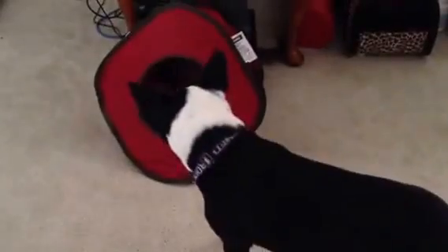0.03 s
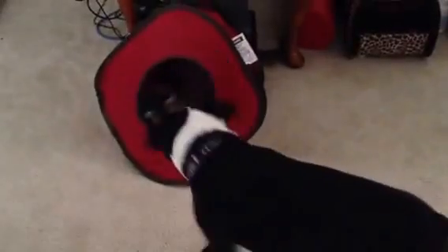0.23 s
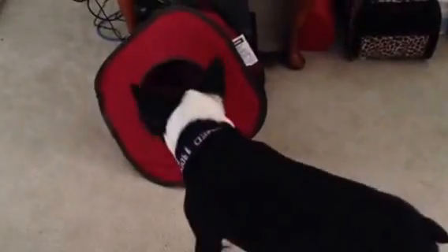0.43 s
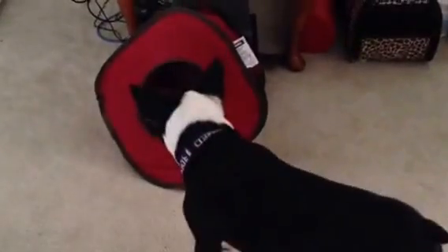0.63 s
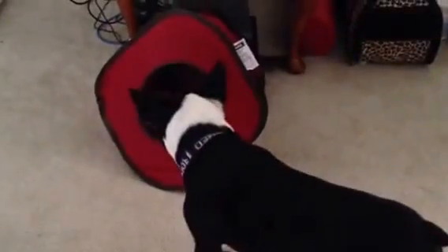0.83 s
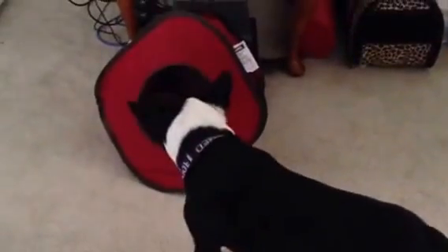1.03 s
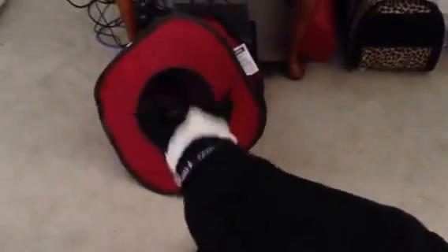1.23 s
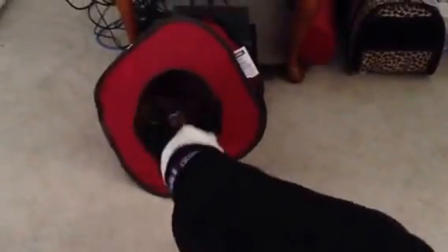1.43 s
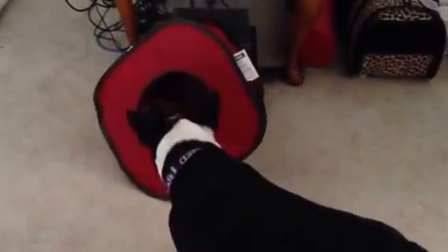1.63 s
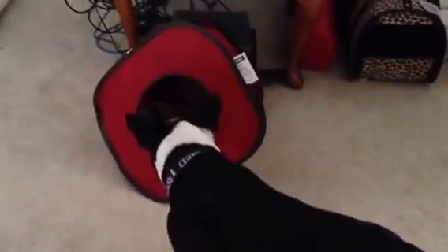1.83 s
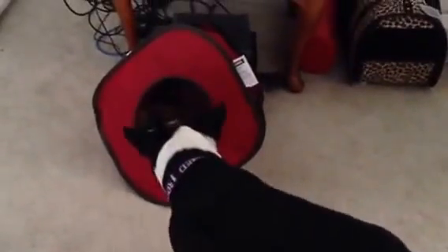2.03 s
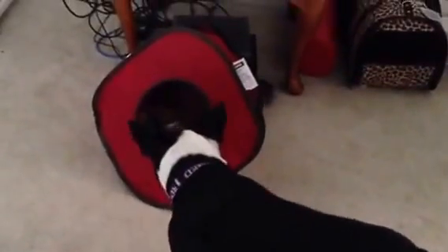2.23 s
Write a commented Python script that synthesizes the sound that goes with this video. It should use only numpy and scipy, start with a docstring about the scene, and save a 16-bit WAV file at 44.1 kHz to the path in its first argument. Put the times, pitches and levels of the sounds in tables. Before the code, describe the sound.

Three low, muffled dog woofs with sniffs and huffs in a quiet room.

```python
"""Over a faint room hum and microphone hiss, a small dog snuffles at a fabric cube in a carpeted room.
It gives three short, muffled woofs into the cloth. Each starts with slow flaps of the vocal folds,
jumps up in pitch and dies in a huff of air through the nose. The flaps make the throat and the nearly
closed mouth ring, and the walls answer with dull echoes."""
import sys
import numpy as np
from scipy import signal
from scipy.fft import rfft, irfft
from scipy.io import wavfile

SR = 44100
rng = np.random.default_rng(int(sys.argv[2]) if len(sys.argv) > 2 else 0)


def wav_out(sig):
    """Save sig, one row per channel (or a flat mono array), as 16-bit PCM at SR to the path in sys.argv[1]."""
    wavfile.write(sys.argv[1], SR, np.round(np.clip(np.atleast_2d(sig).T, -1, 1) * 32767).astype(np.int16))


N = 105840

# tone colour of the steady background: (frequency [Hz], relative level [dB])
BACKGROUND_COLOUR = [(15, -67), (25, -24), (64, -30), (98, -14.5), (125, -14), (224, -3), (264, -7),
                     (450, -8.5), (790, -15.5), (903, -13), (978, -19), (1390, -13), (1540, -18.5),
                     (3930, -15), (15000, -19)]
# the muzzle rubs the cloth: (time [s], spread in time [s], frequency [Hz], level [dB])
CLOTH_RUBS = [(0.026, 0.0041, 770, -68), (0.826, 0.096, 246, -73), (1.242, .005, 850, -70),
              (1.255, 0.0087, 200, -59.5), (2.01, 0.087, 242, -74.5)]
# nostril whistles: (time [s], spread in time [s], frequency [Hz], width [Hz], level [dB])
WHISTLES = [(0.127, .004, 3530, 300, -67), (0.144, 0.015, 1570, 159, -67), (0.149, 0.012, 1960, 221, -64),
            (0.177, .005, 1070, 59.4, -62), (2.135, 0.0067, 1850, 202, -67),
            (2.136, 0.014, 7570, 800, -69.5)]
# sniffs at the cloth: (peak time [s], rise [s], fall [s], level [dB], hiss relative to nose ring [dB])
SNIFFS = [(0.146, 0.029, 0.014, -66, -11)]
# the row at 1.2 s is a faint, very short tick of hiss just before the second woof; the rest are
# nose huffs: (peak time [s], rise [s], fall [s], level [dB], hiss relative to nose ring [dB])
HUFFS_AND_TICK = [(.255, 0.071, 0.09, -69, 5), (0.279, 0.0084, 0.031, -56.5, -11.5),
                  (1.296, 0.025, 0.052, -62.5, 3), (1.2, .004, 0.011, -75, -6),
                  (2.086, 0.025, 0.027, -67, 2), (2.134, 0.031, 0.047, -62, -2.5)]
# where the inside of the nose rings: (frequency [Hz], width [Hz], gain [dB])
NOSE_RINGS = [(1080, 370, 6.5), (1477, 490, 1.5), (1840, 720, 1.5), (2570, 170, -5)]
# tone colour of the hiss at the nostrils: (frequency [Hz], relative level [dB])
NOSTRIL_COLOUR = [(1500, -3.5), (2800, -11), (4000, -4), (5200, -4.5), (6400, -4.5), (7700, -7),
                  (9500, -13.5), (15000, -18)]
# the course of each woof: (time [s], pitch [Hz], effort [dB], mouth opening as a gain [dB])
FIRST_WOOF = [(.214, 58.55, -36.5, 1.5), (0.228, 69.66, -31.5, 1), (.234, 166.3, -29.5, -22),
              (.247, 150.7, -21, -14), (0.257, 140.5, -24, -8.5), (0.265, 125, -26, -19),
              (.274, 151.2, -46.5, -23), (0.288, 142.9, -19.5, -26)]
SECOND_WOOF = [(1.262, 90.1, -41, -1), (1.275, 99.1, -31.5, -2.5), (1.283, 203.9, -36, 0.5),
               (1.297, 203.6, -28, 1), (1.309, 153.8, -25.5, -11), (1.323, 130, -40.5, -6.5),
               (1.340, 132, -48, -25)]
THIRD_WOOF = [(2.055, 86, -36, -9.5), (2.0645, 110.6, -32.5, -1), (2.068, 195.3, -32, -11),
              (2.081, 206.7, -32, -11), (2.093, 185, -32.5, -40), (2.103, 195, -52.5, -19),
              (2.112, 200, -58, -12)]
# a row per woof: (timing scatter [cycles], strength scatter [dB], nose dip depth [0-1], lip cutoff [Hz])
WOOF_CHARACTER = [(0.044, -0.5, 0.92, 874), (0.023, 2, 0, 957), (.01, 1.5, 0.47, 914)]
# where the throat rings: (frequency [Hz], width [Hz], gain [dB])
THROAT_RINGS = [(205.7, 84, -1), (264, 51, -9.5)]
# where the mouth rings: (frequency [Hz], width [Hz], gain [dB])
MOUTH_RINGS = [(503, 24, -7.5), (566, 69, -16), (630, 107, -21.5), (825, 58, -8), (920, 47, -15),
               (997, 38, -3.5), (1166, 23, -20)]
# low notes that ring between the walls: (frequency [Hz], width [Hz], gain [dB])
ROOM_RINGS = [(196.3, 6.1, -14.5), (238.2, 4.8, -8.5), (281.7, 3.9, -9)]
# single bounces off the walls: (delay [s], gain [dB])
WALL_ECHOES = [(.037, -14.5), (0.075, -18)]
# the room's fading tail: (low edge [Hz], high edge [Hz], time to fade by 60 dB [s], gain [dB])
ROOM_TAILS = [(139, 230, 0.35, -16.5), (417, 1930, 0.27, -7), (1420, 9200, 0.23, -10)]


def gain(db):
    """Turn decibels into a number to multiply by."""
    return 10 ** (np.asarray(db) / 20)


def unit(x):
    """Scale a sound to an average (rms) size of 1."""
    return x / np.sqrt(np.mean(x ** 2))


def keep(x, hz, kind, order=2):
    """Keep the lows, the highs or a band; a higher order cuts more sharply."""
    return signal.sosfilt(signal.butter(order, hz, kind, fs=SR, output="sos"), x)


def ring(x, hz, width_hz):
    """Ring at one frequency; a narrower width rings longer."""
    return signal.lfilter(*signal.iirpeak(hz, hz / width_hz, fs=SR), x)


def cavity(x, rings):
    """A hollow space rings at several frequencies at once."""
    return sum(gain(db) * ring(x, hz, width_hz) for hz, width_hz, db in rings)


def coloured_noise(colour):
    """Steady noise of size 1 with the given tone colour."""
    hz, db = np.array(colour).T
    frequencies = np.maximum(np.fft.rfftfreq(N, 1 / SR), 1)
    shape = gain(np.interp(np.log(frequencies), np.log(hz), db))
    return unit(irfft(rfft(rng.standard_normal(N)) * shape, N))


def noise_burst(t, at, spread, hz, width_hz):
    """Noise around one frequency swells and fades in a bell shape."""
    swell = np.exp(-((t - at) / spread) ** 2 / 2)
    band = ring(rng.standard_normal(N), hz, width_hz)
    return swell * unit(ring(band, hz, width_hz))


def background(level_db=-67):
    """The quiet room and the microphone make a steady low hum of noise and a hiss."""
    return gain(level_db) * coloured_noise(BACKGROUND_COLOUR)


def cloth_rubs(t):
    """The muzzle rubs on the padded cloth with a dull rustle."""
    return sum(gain(db) * noise_burst(t, at, spread, hz, width_hz=202)
               for at, spread, hz, db in CLOTH_RUBS)


def nostril_whistles(t):
    """Air whistles briefly through the narrow nostrils."""
    return sum(gain(db) * noise_burst(t, at, spread, hz, width_hz)
               for at, spread, hz, width_hz, db in WHISTLES)


def breaths_and_tick(t):
    """Breaths ring in the nose and hiss at the nostrils; the same noise also makes one faint tick."""
    nose = cavity(rng.standard_normal(N), NOSE_RINGS)
    nose = unit(keep(nose, [350, 3200], "band"))
    hiss = coloured_noise(NOSTRIL_COLOUR)
    out = np.zeros(N)
    for at, rise, fall, db, hiss_db in HUFFS_AND_TICK + SNIFFS:
        swell = np.exp(-np.maximum((at - t) / rise, (t - at) / fall))
        out += gain(db) * swell * (nose + gain(hiss_db) * hiss)
    return out


def vocal_folds(t, times, hz, timing_scatter, strength_scatter_db):
    """The vocal folds flap unevenly; each cycle gives a pulse and a raspy puff of air."""
    rasp_db, puff_fade_cycles = -9, 0.37
    pitch = np.interp(t, times, hz)
    cycles = np.cumsum(pitch * (t >= times[0])) / SR
    count = int(np.interp(times[-1], t, cycles)) + 1
    timing_luck, strength_luck = rng.standard_normal((64, 2))[:count].T
    flap_cycles = np.maximum(np.arange(count) + timing_scatter * timing_luck, 1e-6)
    pulse_height = SR / (2 * THROAT_RINGS[0][0])
    pulses = np.zeros(N)
    pulses[np.searchsorted(cycles, flap_cycles)] = pulse_height * gain(strength_scatter_db * strength_luck)
    puff_fade = np.exp(-(cycles % 1) / puff_fade_cycles)
    puffs = rng.standard_normal(N) * puff_fade * np.sqrt(SR / pitch)
    return pulses + gain(rasp_db) * puffs


def woof(t, course, timing_scatter, strength_scatter_db, nose_dip, lips_hz):
    """The vocal folds ring the throat and the mouth, while a push of air adds a soft thump."""
    times, hz, effort_db, opening_db = np.array(course).T
    effort = gain(np.interp(t, times, effort_db)) * (t >= times[0]) * (t <= times[-1])
    buzz = effort * vocal_folds(t, times, hz, timing_scatter, strength_scatter_db)
    throat = keep(cavity(buzz, THROAT_RINGS), 344, "low", order=4)
    opening = gain(np.interp(t, times, opening_db))
    mouth = cavity(buzz * opening, MOUTH_RINGS)
    mouth = keep(mouth, lips_hz, "low", order=6)  # the lips muffle it
    mouth = keep(mouth, 480, "high", order=3)
    voice = keep(throat + mouth, 145, "high", order=5)
    voice -= nose_dip * ring(voice, hz=393, width_hz=240)  # the nose swallows this band
    rumble = unit(keep(rng.standard_normal(N), [20.9, 83.6], "band"))
    thump = gain(-45) * effort * rumble
    return voice + thump


def room(t, x):
    """The walls add a few low ringing notes, dull echoes and a short fading tail."""
    out = x + cavity(x, ROOM_RINGS)
    dull = keep(x, 480, "low")
    for delay, db in WALL_ECHOES:
        out += gain(db) * np.interp(t - delay, t, dull, left=0)
    build_up = 1 - np.exp(-(t / 0.0039) ** 2)  # the tail takes about 4 ms to form
    for low_hz, high_hz, fade_s, db in ROOM_TAILS:
        fade = np.exp(-np.log(1000) * t / fade_s)
        tail = keep(rng.standard_normal(N), [low_hz, high_hz], "band") * fade * build_up
        tail *= np.sqrt(2 * (high_hz - low_hz) / SR / np.sum(tail ** 2))  # gain near 1 in its band
        out += gain(db) * signal.fftconvolve(x, tail)[:N]
    return out


def scene():
    """The dog snuffles and woofs in the room, over the steady background."""
    t = np.arange(N) / SR
    courses = (FIRST_WOOF, SECOND_WOOF, THIRD_WOOF)
    woofs = sum(woof(t, course, *character) for course, character in zip(courses, WOOF_CHARACTER))
    sounds = woofs + breaths_and_tick(t) + nostril_whistles(t) + cloth_rubs(t)
    return (room(t, sounds) + background())[None]


def record(dry):
    """Cut away the very highest treble steeply."""
    top_hz = 15350
    return signal.sosfilt(signal.ellip(10, .1, 70, top_hz, fs=SR, output="sos"), dry)


dry = scene()
out = record(dry)
wav_out(out)
```